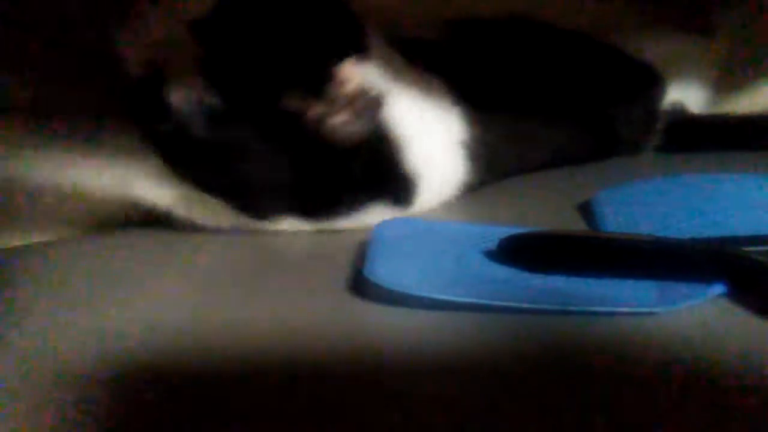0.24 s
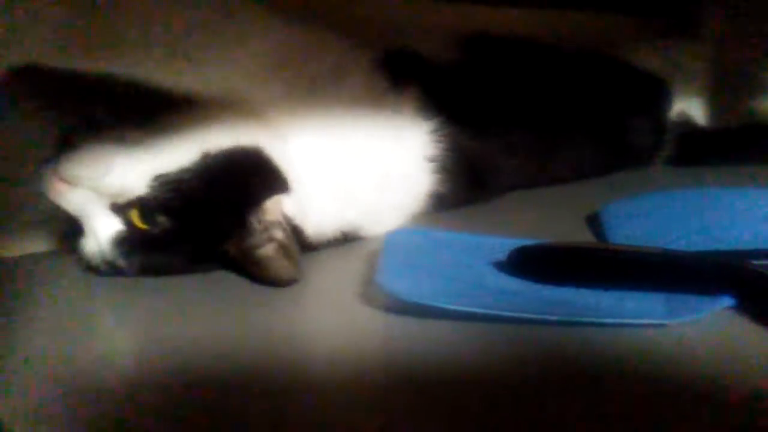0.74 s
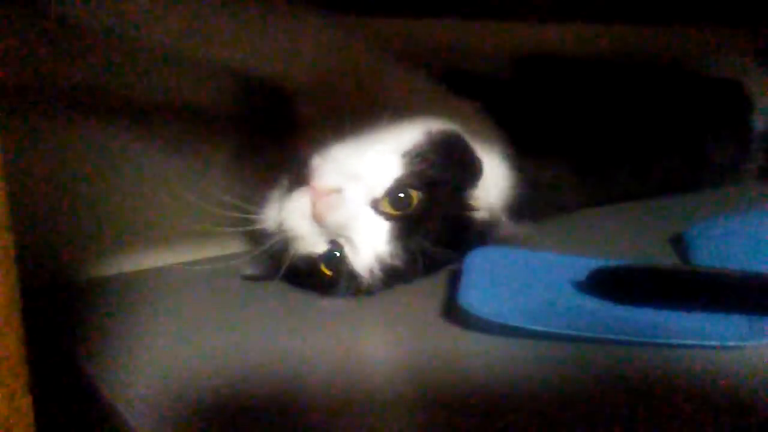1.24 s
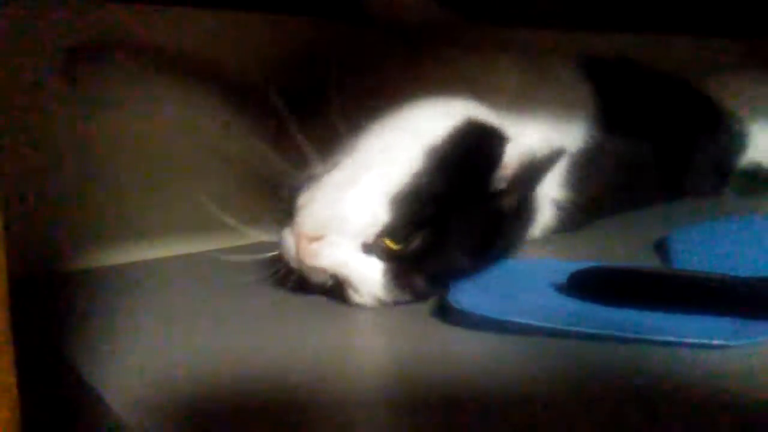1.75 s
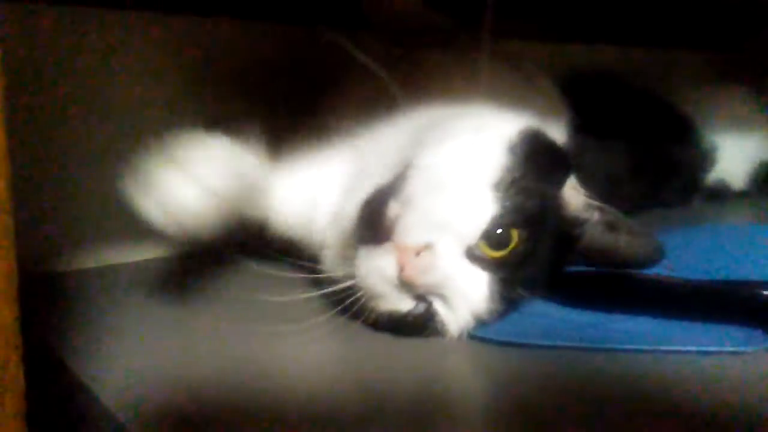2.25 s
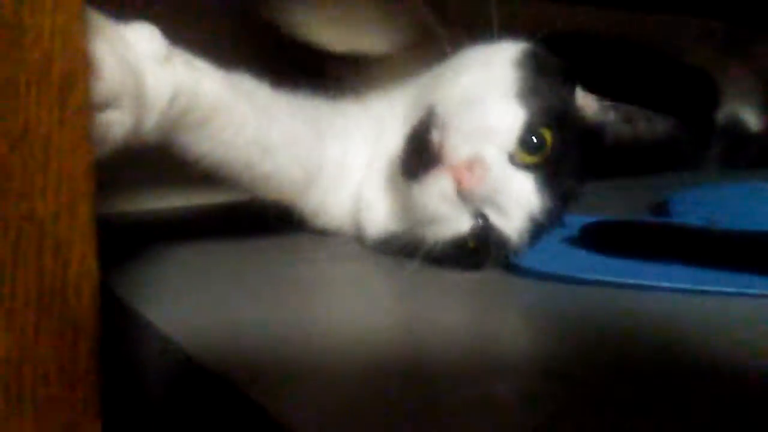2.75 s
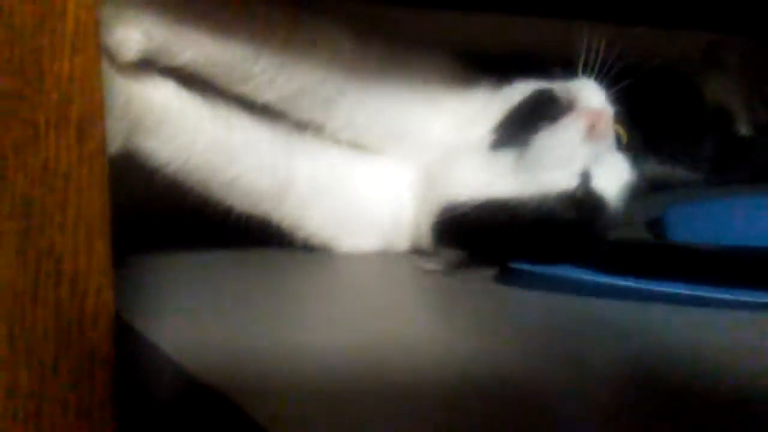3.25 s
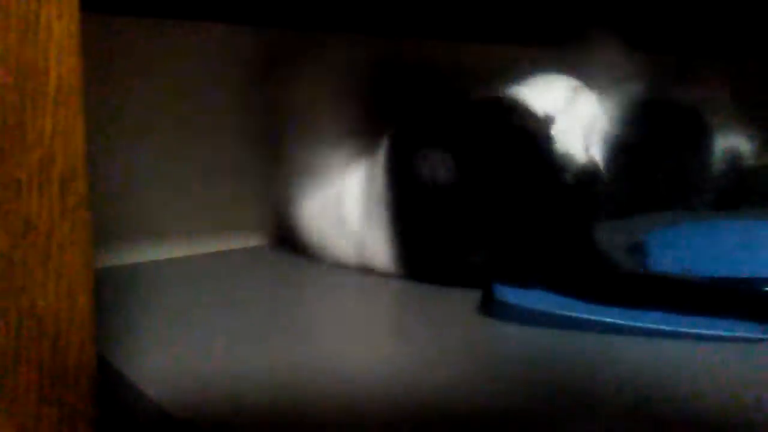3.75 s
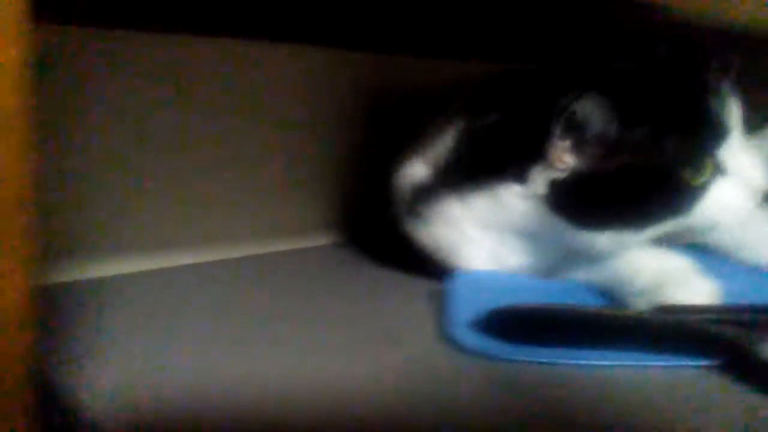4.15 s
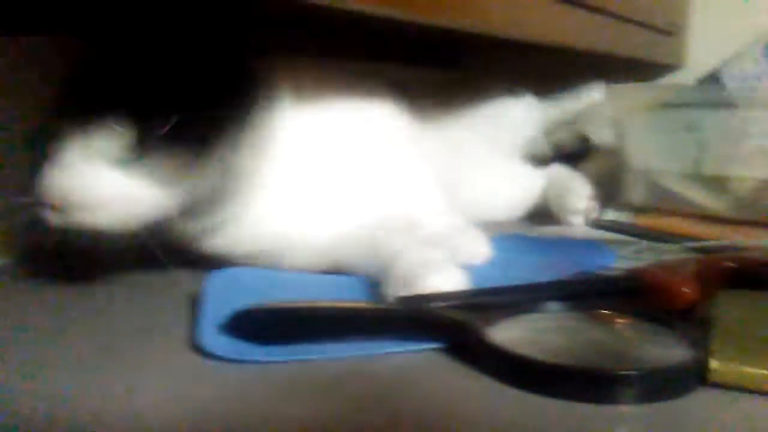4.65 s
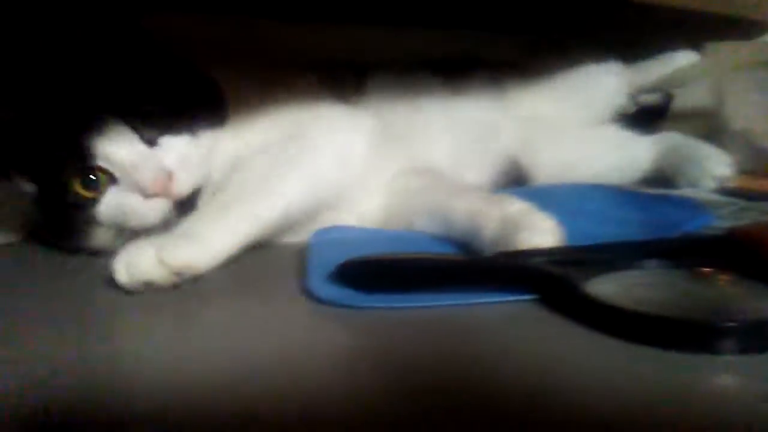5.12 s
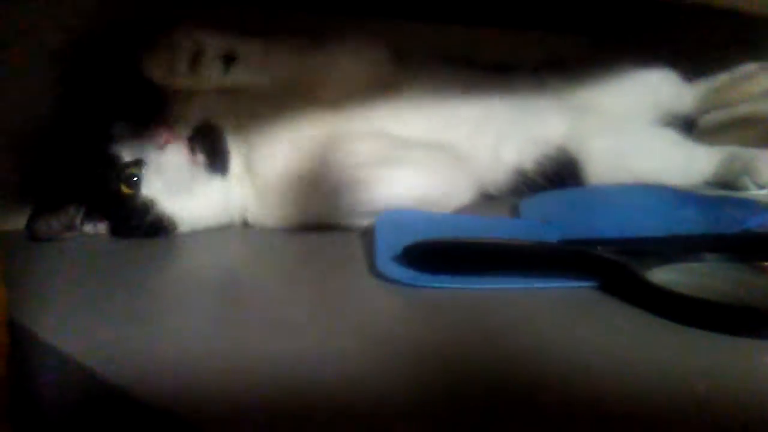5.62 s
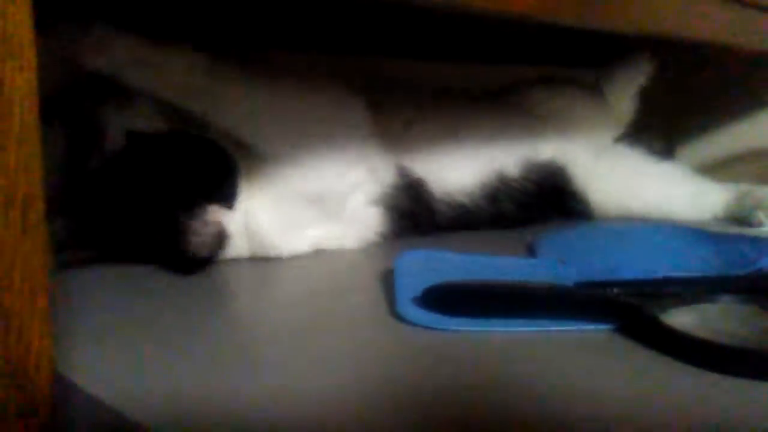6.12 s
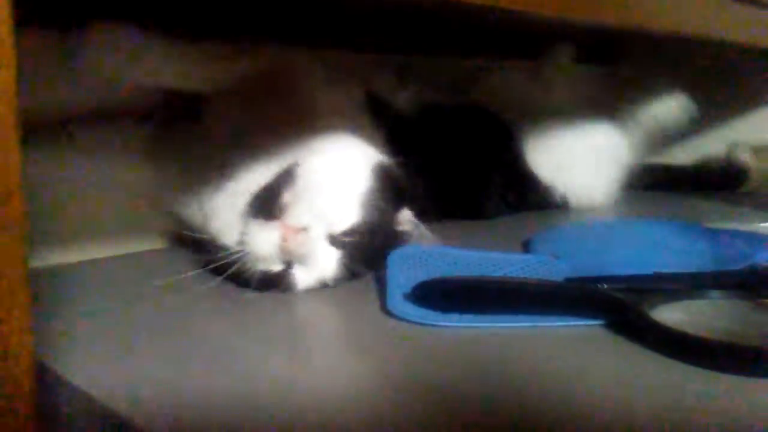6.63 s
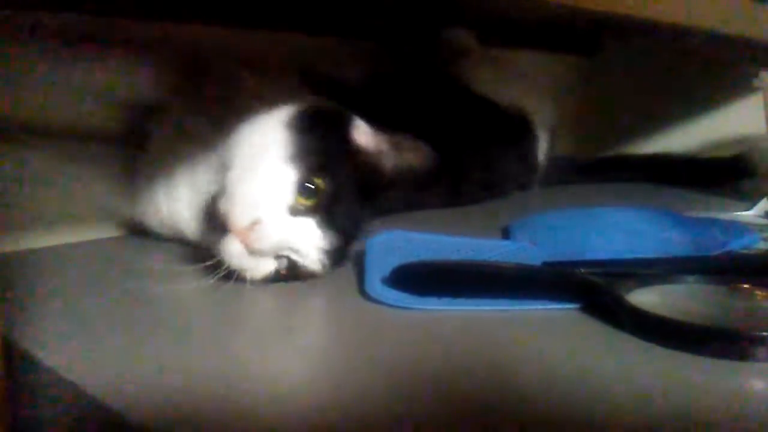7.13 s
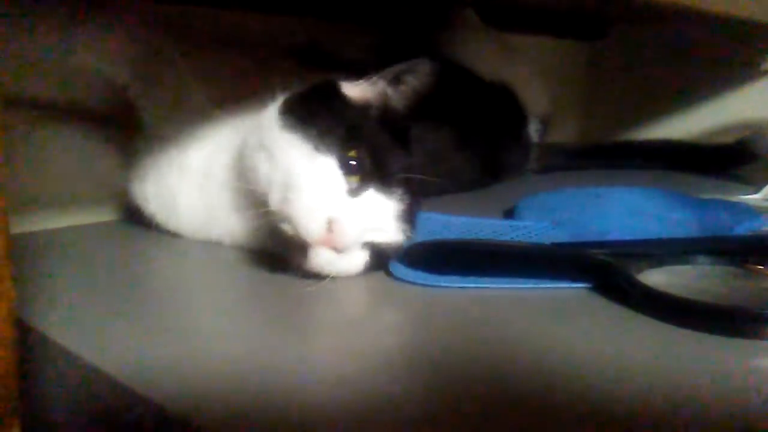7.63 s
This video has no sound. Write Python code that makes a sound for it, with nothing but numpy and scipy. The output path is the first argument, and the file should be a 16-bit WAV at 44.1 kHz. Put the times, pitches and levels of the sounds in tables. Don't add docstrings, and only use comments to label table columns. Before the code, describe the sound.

Constant single-pitch fridge hum with airy fan noise, under soft fur rustles, quick scratchy paw scuffs and a few small dry claw knocks.

```python
import sys
import numpy as np
from scipy import signal
from scipy.fft import rfft, irfft, next_fast_len
from scipy.io import wavfile
from scipy.ndimage import uniform_filter1d, map_coordinates

SR = 44100
rng = np.random.default_rng(int(sys.argv[2]) if len(sys.argv) > 2 else 0)


def generate_wav(sig):
    pcm = np.round(np.clip(np.atleast_2d(sig).T, -1, 1) * 32767).astype(np.int16)
    wavfile.write(sys.argv[1], SR, pcm)


def ratio(d):
    e = np.asarray(d, float) / 20
    return 10 ** e


N = 347508
STEP = 32

# time_s, level_db
DRAUGHT = [
    (0, -56),
    (2.5, -52),
    (4.6, -45),
    (7.88, -43),
]


def unit(x):
    return x / np.sqrt(np.mean(x ** 2) + 1e-20)


def along(points, hz):
    f, v = np.transpose(points)
    return np.interp(np.log(hz + 1), np.log(f + 1), v)


def curves(rows):
    s, *cols = np.transpose(rows)
    return [np.interp(np.arange(N) / SR, s, c) for c in cols]


def wobble(rate):
    knots = rng.standard_normal(int(N * rate / SR) + 4)
    return map_coordinates(knots, [np.arange(N) * rate / SR])


def filtered(x, response):
    m = next_fast_len(len(x) + 8192)
    return irfft(rfft(x, m) * response(np.fft.rfftfreq(m, 1 / SR)), m)[:len(x)]


def rush(spectrum, patchy_db, frames=8):
    z = signal.stft(rng.standard_normal(N), nperseg=512)[2]
    field = uniform_filter1d(rng.standard_normal(z.shape), size=3, axis=0)
    field = uniform_filter1d(field, size=int(frames), axis=1)
    x = signal.istft(z * ratio(patchy_db * unit(field)), nperseg=512)[1][:N]
    return unit(filtered(x, lambda hz: ratio(along(spectrum, hz))))


def peak(f, hz, width):
    return 1j * f * width / (hz * hz - f * f + 1j * f * width)


def stroke(s, rise, fall, db):
    u = np.arange(0, N + STEP, STEP) / SR - s
    return ratio(db - 10 * np.where(u < 0, -u / rise, u / fall)) ** 2


def fridge():
    # time_s, pitch_hz, level_db
    tone_track = [
        (0, 349.2, -26.4),
        (.75, 349.15, -26.4),
        (2.25, 349.95, -25.7),
        (4.25, 351.65, -26.1),
        (5.25, 351.75, -25.9),
        (6.25, 352.1, -25.6),
        (6.75, 352.1, -25.5),
        (7.88, 351.7, -25.1),
    ]
    # centre_hz, width_hz, level_db
    cabinet = [(190, 31.6, -20.5), (215, 32, -25), (273.9, 16.6, -10.5), (297, 31, -14.5),
               (338.6, 25, -10.5), (367.3, 22, -17.5), (390.4, 22.3, -16.5), (511.2, 33.5, -21),
               (689, 39, -23), (1058, 91, -29), (1225, 51, -28), (1703, 70, -31)]
    # frequency_hz, level_db per Hz
    air = [(250, -28.5), (420, -3), (446, -3.5), (692, -5), (910, -9), (1040, -6.5), (1480, -10.5),
           (2330, -11.5), (2750, -18), (3610, -14.5), (4020, -20.5), (4530, -54.5), (7820, -31),
           (15700, -50)]
    # frequency_hz, level_db per Hz
    rumble = [(15, -76.5), (25, -47), (59, -16.5), (150, -26), (177, 1), (198, -4), (241, -5), (250, 0),
              (320, -36), (550, -120)]
    # frequency_hz, level_db per Hz
    vent = [(500, -32), (750, -4.5), (850, -1.5), (1030, 1), (1150, -8), (1500, -30.5)]

    hz, db = curves(tone_track)
    turn = 2 * np.pi * np.cumsum(hz + 0.14 * wobble(6)) / SR
    ninth = ratio(-24 + 2.5 * wobble(2)) * np.sin(turn * 9 / 8)
    tone = np.sqrt(2) * ratio(db + 0.25 * wobble(6.6)) * (np.sin(turn) + ninth)

    def modes(f):
        return sum((-1) ** k * ratio(g) * peak(f, c, w) ** 2 for k, (c, w, g) in enumerate(cabinet))

    boom = ratio(-36 + 0.45 * wobble(4)) * unit(filtered(rng.standard_normal(N), modes))
    draught = ratio(curves(DRAUGHT)[0] - 5.5) * rush(vent, patchy_db=2.0)
    fan_air = ratio(-43) * rush(air, patchy_db=1.4)
    return tone + boom + draught + fan_air + ratio(-50.5) * rush(rumble, patchy_db=0.2)


def fur():
    # peak_s, rise_s per 10 dB, fall_s per 10 dB, hiss_db, panel_over_hiss_db
    rolls = [(0.002, .05, .45, -43, 2), (.455, .1, .2, -43, 0), (.94, .45, .15, -47, -4),
             (1.12, .1, .4, -52, -2), (1.35, .13, .1, -42.5, 2), (1.63, .045, .4, -52.5, 6),
             (2.18, .2, .05, -60, 8), (2.58, .07, .09, -50, 6), (2.43, .03, .3, -59, 6),
             (2.905, .08, .085, -42.5, 4), (3.326, .2, .12, -54.5, 7), (3.63, .035, .6, -55, 6),
             (3.97, .03, .15, -51, 6), (4.4, .3, .3, -52, 5), (5.1, .1, .15, -57, 2),
             (6.3, .1, .065, -51.5, 4), (6.605, .018, .08, -53, 11), (6.67, .04, .12, -49, -3),
             (7.01, .04, .14, -45, 3), (7.2, .05, .2, -57, 0), (7.39, .1, .25, -55, 6),
             (7.64, .2, 1.5, -55.5, 8)]
    # peak_s, rise_s per 10 dB, fall_s per 10 dB, hiss_db, panel_over_hiss_db
    swishes = [(.06, .02, .03, -38, 2), (.342, .06, .04, -42, 1), (1.855, .04, .07, -49, 5),
               (.94, .06, .05, -53, 13), (2.82, .03, .03, -56, 15), (5.55, .03, .08, -56, 0),
               (5.92, .03, .07, -55, 0), (3.922, .04, .025, -44, -9), (4.79, .03, .07, -36.5, -2),
               (4.831, .03, .03, -47, 15), (4.9, .06, .05, -42, 5), (4.975, .065, .04, -29.5, -2),
               (5.02, .04, .025, -30.5, -1), (5.45, .03, .027, -29, -5), (4.8, .04, .03, -41, -2),
               (5.83, .1, .05, -51, 0), (5.868, .03, .028, -41.5, 4), (6.208, .04, .07, -45, -1),
               (6.96, .02, .05, -48, 8), (7.56, .03, .05, -56, 13), (4.7, .02, .03, -38, 3)]
    # start_s, fall_s per 10 dB, hiss_db, brightness_db, panel_over_hiss_db
    grips = [
        (1.994, .22, -51, -5, 7),
        (2.72, .04, -54, -14, 10),
        (3.14, .06, -51, -4, 3),
        (3.863, .1, -46.5, -1, 6),
        (4.15, .08, -54, -2, 4),
        (4.547, .05, -46, -1, 2),
        (4.638, .08, -37, -8, 1),
        (5.661, .03, -56, -11, 5),
        (5.734, .05, -44, -5, 2),
        (6.121, .03, -37, -12, -1),
    ]
    # frequency_hz, level_db per Hz
    hiss = [(3500, -31.5), (4500, -11.5), (5500, -9), (6300, -8), (7450, -1), (8740, -1.5), (9600, -5),
            (10500, -11.5), (13600, -34.5)]
    # frequency_hz, level_db per Hz
    sheen = [(8500, -32), (9900, -5), (10900, 1), (12800, -3), (14500, -3.5), (15700, -5), (17000, -8.5)]
    # frequency_hz, level_db per Hz
    panel_body = [(530, -50), (900, -16.5), (1330, -5.5), (1760, -7), (2000, -3), (2060, -2.5), (2780, -8),
                  (3880, -6), (4600, -21.5), (5980, -57), (10100, -120)]
    rest_db, rest_bright_db, body_rest_db = -81, -11, -51

    moves = []  # power, brightness in dB, panel over hiss in dB
    for s, rise, fall, db, over in rolls:
        moves.append((stroke(s, rise, fall, db), -6.3 + .22 * (db + 50), over))
    for s, rise, fall, db, over in swishes:
        moves.append((stroke(s, rise, fall, db), -7.5 - .5 * over, over))
    for s, fall, db, bright, over in grips:
        moves.append((stroke(s, .003, fall, db), bright, over))

    def full(v):
        return np.interp(np.arange(N), STEP * np.arange(len(v)), v)

    rest_power = ratio(rest_db) ** 2
    power = rest_power + sum(p for p, _, _ in moves)
    hiss_db = full(10 * np.log10(power))
    bright_db = full((rest_power * rest_bright_db + sum(p * bright for p, bright, _ in moves)) / power)
    still_body = ratio(body_rest_db - .9 * (curves(DRAUGHT)[0] + 52))
    body = np.sqrt(still_body ** 2 + full(sum(p * ratio(over) ** 2 for p, _, over in moves)))
    hard = np.clip((hiss_db + 47) / 14, 0, .9)
    flicker = 1.25 * wobble(40) + 0.55 * wobble(300) + 1.5 * hard * wobble(120)

    def layer(colour):
        smooth = np.sqrt(1 - hard) * rush(colour, patchy_db=1.5)
        return smooth + np.sqrt(hard) * rush(colour, patchy_db=4.5, frames=7)

    high = layer(hiss) + ratio(bright_db) * layer(sheen)
    return ratio(hiss_db + flicker) * high + body * ratio(.7 * flicker) * layer(panel_body)


def pings():
    # start_s, fall_s,
    # pitch_hz, level_db
    mode_rings = [(.052, .012, 2300, -36), (.054, .012, 3950, -38), (3.86, .012, 5600, -43),
                  (3.947, .008, 2000, -34), (3.951, .008, 950, -33), (3.908, .012, 10900, -40),
                  (3.912, .01, 15200, -42), (3.912, .015, 7800, -45), (3.975, .008, 1950, -39),
                  (4.071, .008, 1850, -33), (4.149, .005, 3700, -36), (4.15, .006, 12200, -48),
                  (4.603, .02, 1780, -35), (4.637, .02, 1840, -32), (4.655, .014, 1870, -35),
                  (4.672, .012, 1820, -33), (4.694, .012, 1800, -31), (4.642, .015, 3750, -37),
                  (4.71, .03, 2200, -37), (4.825, .006, 850, -30), (4.832, .015, 620, -32),
                  (4.9, .015, 2230, -36), (4.91, .015, 2950, -37), (4.935, .02, 2230, -35),
                  (5.018, .012, 2030, -30), (5.05, .035, 2030, -42), (5.393, .014, 7050, -39),
                  (5.432, .01, 8700, -35), (5.445, .012, 7300, -32), (5.443, .03, 2950, -39),
                  (5.732, .015, 7000, -33), (5.74, .045, 2150, -40), (5.862, .006, 11700, -40),
                  (5.86, .025, 8900, -43), (5.865, .02, 2300, -38), (5.865, .015, 3800, -43),
                  (6.062, .006, 3700, -37), (6.135, .05, 2050, -41), (6.122, .025, 2700, -38),
                  (6.15, .02, 2700, -40), (6.19, .02, 7150, -45), (6.349, .004, 1250, -30),
                  (6.357, .006, 1250, -28), (6.352, .008, 600, -35), (6.352, .003, 2250, -29),
                  (6.354, .004, 1650, -33), (6.92, .03, 2200, -42), (6.95, .05, 3900, -45),
                  (6.96, .04, 2950, -45)]
    rise_s, wander_share = .0015, .008

    out, t = np.zeros(N + SR), np.arange(SR // 4) / SR
    wander, rough = wobble(300), ratio(3 * wobble(250))
    for s, fall, hz, db in mode_rings:
        start = round(s * SR)
        turn = 2 * np.pi * hz * np.cumsum(1 + wander_share * wander[start:][:len(t)]) / SR
        envelope = np.minimum(t / rise_s, 1) * np.exp(-(t / fall) ** 1.5)
        out[start:][:len(t)] += np.sqrt(2) * ratio(db) * envelope * np.sin(turn)
    return out[:N] * rough


def taps():
    # start_s, peak_db, low_modes_db, high_modes_db
    knocks = [(0.053, -29, -23, 4.5), (1.16, -28, -13, -17), (1.274, -27, -17, 1), (1.849, -25, -6, -19),
              (2.155, -25, -15, -16), (2.663, -23, -23, -22), (3.946, -19, -9, -24), (3.974, -24, -9, -23),
              (4.069, -12, -20, -19), (4.146, -11, -18, -17), (4.781, -23, -2, -16), (4.509, -27, -10, -20),
              (4.824, -18, -3.5, -13), (4.833, -17, -8, -14), (6.058, -24, -8, -4), (6.352, -12, -12, -7),
              (6.366, -24, -14, -12), (7.569, -24, -21, -7)]
    # pitch_hz, level_db
    wood_modes = [(480, -3.5), (590, -2.5), (700, -3), (800, -3), (1000, 0.5), (1240, 1.5), (1450, -2),
                  (1670, 1.5), (1950, -1), (2180, 1), (2400, -1), (2800, -1), (3300, 0), (3700, -9)]
    t60_s, rise_s = .032, .00092

    out, t = np.zeros(N + SR), np.arange(SR // 5) / SR
    hz, level = np.transpose(wood_modes)
    sign = (-1) ** np.arange(len(hz))
    for s, db, low_db, high_db in knocks:
        chance = rng.standard_normal((2, len(hz)))
        tilt = np.interp(hz, [800, 1200, 2200, 2820], [low_db + 9.5, 0, 0, high_db + 7.5])
        fade = ratio(-60 * t[:, None] / t60_s * (hz / 1200) ** 0.57)
        swing = np.sin(2 * np.pi * t[:, None] * hz * (1 + 0.037 * chance[0]))
        ring = (fade * swing) @ (sign * ratio(level + tilt + 1.8 * chance[1]))
        attack = np.sin(np.pi / 2 * np.minimum(t / rise_s, 1)) ** 2
        out[round(s * SR):][:len(t)] += ratio(db - 14) * attack * ring
    out = out[:N]
    near_echo = ratio(-8.5) * np.roll(out, round(0.00347 * SR))
    return out + near_echo + ratio(-16) * np.roll(out, round(.022 * SR))


def wipes():
    # peak_s, rise_s, fall_s, centre_hz, level_db
    brushes = [(4.4, .12, .12, 15200, -54), (4.655, .015, .02, 12500, -41), (4.6, .04, .03, 9000, -46),
               (4.6, .05, .04, 13500, -52), (4.98, .07, .055, 4900, -35), (5.455, .03, .04, 4900, -35),
               (4.76, .05, .08, 13800, -49), (4.85, .04, .04, 14000, -48), (5.422, .022, .015, 13500, -42),
               (5.445, .015, .025, 11500, -40), (5.455, .03, .04, 6200, -36),
               (5.855, .025, .02, 13000, -51), (3.89, .03, .04, 14000, -47), (6.97, .04, .07, 2600, -47),
               (6.126, .005, .025, 1800, -38), (6.063, .003, .006, 3600, -41), (4.83, .006, .01, 1900, -31),
               (.058, .005, .012, 3900, -40), (6.205, .02, .012, 12000, -53)]

    out, u = np.zeros(N), np.arange(-SR // 2, SR // 2) / SR
    for s, rise, fall, hz, db in brushes:
        noise = rng.standard_normal(len(u))
        band = unit(filtered(noise, lambda f: peak(f, hz, .25 * hz) ** 2))
        swell = np.exp(-(u / np.where(u < 0, rise, fall)) ** 2)
        part = out[round(s * SR) - SR // 2:][:len(u)]
        part += (ratio(db) * swell * band)[:len(part)]
    return out


def paws():
    # start_s, peak_db, brightness_db
    scuffs = [(0.3297, -32.5, -18.5), (1.1884, -32, -13), (1.9924, -37.5, -8.5), (2.7157, -44, -21),
              (2.805, -35, -17), (2.8554, -38, -13), (3.137, -37.5, -13.5), (3.8596, -29, -8.5),
              (3.944, -34.5, -18.5), (4.145, -33, -12), (4.5451, -28, -9.5), (4.6355, -24, -22),
              (4.6738, -24, -19.5), (4.9004, -26, -13), (5.658, -44, -21), (5.732, -26, -19),
              (5.796, -33, -16), (5.8606, -28, -20), (6.1213, -27, -18), (6.2044, -33, -16),
              (4.9284, -26, -18), (6.19, -34, -18), (7.5725, -40, -20)]
    t60_s, rise_s = .057, .00069

    out, t = np.zeros(N + SR), np.arange(SR // 4) / SR
    bands = np.arange(0, SR / 2, 250)
    for s, db, bright_db in scuffs:
        colour = [(1200, -32.5), (2500, -10), (4100, -8.5), (4700, -20.5), (5500, -1.5), (7300, 2.5), (10000, -7),
                  (12000, bright_db + 8), (14500, bright_db + 10), (16000, bright_db + 8)]
        streaks = rng.standard_normal(len(bands))

        def response(f):
            return ratio(along(colour, f) + 4.5 * np.interp(f, bands, streaks))

        puff = unit(filtered(rng.standard_normal(len(t)), response))
        out[round(s * SR):][:len(t)] += ratio(db - 10 - 60 * t / t60_s) * np.minimum(t / rise_s, 1) * puff
    return out[:N]


def claws():
    # peak_s, fall_s, pitch_hz, level_db
    scrapes = [(.34, .032, 3900, -46), (.452, .2, 2250, -50), (.95, .04, 3960, -45), (2.58, .03, 5800, -54),
               (3.916, .008, 14000, -41), (3.947, .003, 8600, -36), (4.48, .015, 3900, -43),
               (4.66, .035, 7000, -37), (4.7, .015, 6900, -39), (4.665, .02, 9200, -42),
               (4.6, .04, 11400, -48), (4.75, .03, 13300, -46), (4.8, .02, 9600, -42),
               (4.87, .03, 7100, -42), (4.91, .015, 9000, -40), (4.96, .03, 9300, -40),
               (5.02, .015, 9500, -38), (4.95, .02, 7000, -37), (4.635, .02, 930, -38),
               (4.68, .015, 600, -37), (4.765, .015, 600, -37), (4.86, .02, 1050, -39),
               (4.71, .026, 11400, -45), (4.82, .04, 2200, -42), (4.97, .045, 1950, -32),
               (4.95, .03, 1300, -39), (5.01, .03, 1350, -36), (5.0, .035, 4000, -36),
               (4.99, .03, 7800, -35), (5.8, .02, 7040, -46), (5.79, .02, 11400, -50),
               (5.01, .02, 3350, -40), (6.3535, .003, 2600, -31.5)]
    # start_s, level_db, place (0 middle to 1 rim)
    strikes = [
        (3.865, -45, 1),
        (3.915, -49, 1),
        (4.55, -48, .9),
        (4.64, -42, .2),
        (5.735, -42, 0),
        (5.866, -47, .1),
        (6.126, -36, 0),
    ]
    # pitch_hz, middle_hit_db, rim_hit_db
    panel = [(2050, -5, -12), (2700, -8, -14), (5750, -16, 1), (7200, 1, -10), (8900, -1, -10),
             (11500, -8, -8), (14600, -10, -5)]

    out, t = np.zeros(N + SR), np.arange(3 * SR) / SR
    rows = [(s, .7 * fall, fall, hz, db) for s, fall, hz, db in scrapes]
    chance = rng.standard_normal((len(strikes), len(panel), 2))
    for (s, db, place), luck in zip(strikes, chance):
        for (hz, middle, rim), (a, b) in zip(panel, luck):
            fall = .05 / (1 + (2 * hz / 16000) ** 2)
            level = db + middle + place * (rim - middle) + 1.5 * b
            rows.append((s, .003, fall, hz * (1 + .01 * a), level))
    for s, rise, fall, hz, db in rows:
        u = t[:round((3 * rise + 6 * fall) * SR)] - min(3 * rise, s)
        swell = np.where(u < 0, np.exp(-(u / rise) ** 2), np.exp(-np.abs(u) / fall))
        noise = rng.standard_normal(len(u))
        ring = unit(filtered(noise, lambda f: peak(f, hz, 60 + .025 * hz) ** 2))
        out[max(round((s - 3 * rise) * SR), 0):][:len(u)] += ratio(db) * swell * ring
    return out[:N]


def scene():
    return (fridge() + fur() + pings() + taps() + wipes() + paws() + claws())[None]


def starved(x, busy_db, loud_db, share):
    # low_hz, high_hz
    weak_bands = [(4330, 4700), (4700, 5080)]

    hz, _, z = signal.stft(x, SR, nperseg=1024)
    gain = np.ones(z.shape)
    treble = np.sqrt(np.sum(abs(z[(hz > 5500) & (hz < 10000)]) ** 2, axis=0))
    for low, high in weak_bands:
        luck = np.repeat(rng.random(z.shape[1]), 3)[:z.shape[1]]
        masked = (treble > ratio(busy_db)) & (luck < .9)
        empty = (treble < ratio(loud_db)) & ((luck < share) | masked)
        gain[(hz > low) & (hz < high)] = np.where(empty, ratio(-23), 1)
    return signal.istft(z * gain, SR, nperseg=1024)[1][:N]


def roll_off(x):
    return signal.sosfilt(signal.butter(12, 16200, fs=SR, output="sos"), x)


def record(dry):
    # frequency_hz, level_db
    notch = [(30, -7.5), (120, 0), (4030, 0), (4130, -4), (4270, -4.5), (4340, -16.5), (4900, -15),
             (5350, -11.5), (5480, -7.5), (6200, 0)]
    top_hz = 15730

    heard = filtered(dry[0], lambda hz: ratio(along(notch, hz)) * (hz < top_hz))
    mix = starved(heard, busy_db=-52, loud_db=-36, share=.55)[None]
    return roll_off(mix)


dry = scene()
out = record(dry)
generate_wav(out)
```